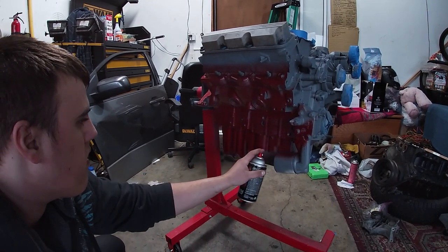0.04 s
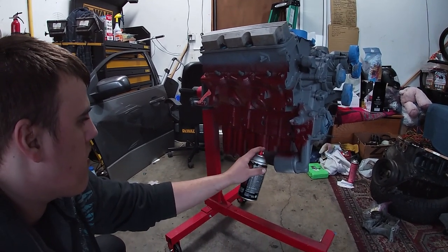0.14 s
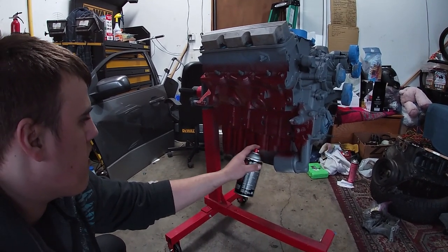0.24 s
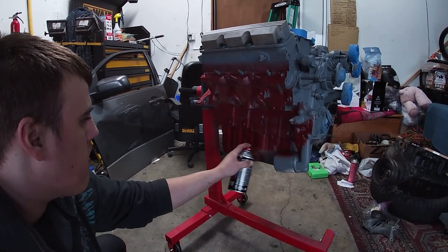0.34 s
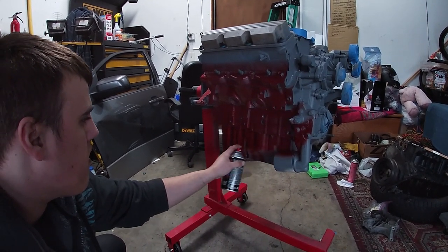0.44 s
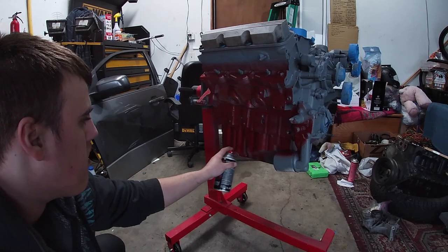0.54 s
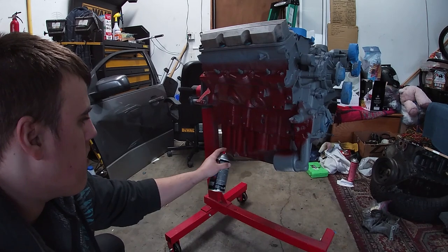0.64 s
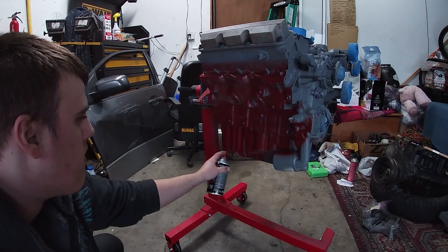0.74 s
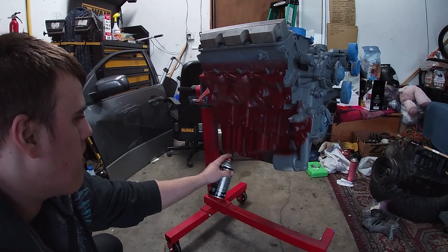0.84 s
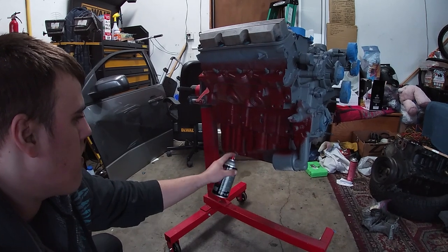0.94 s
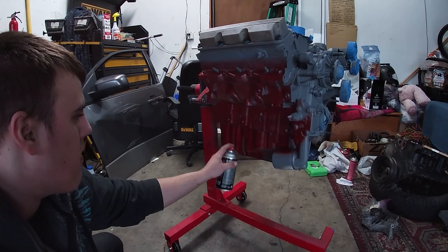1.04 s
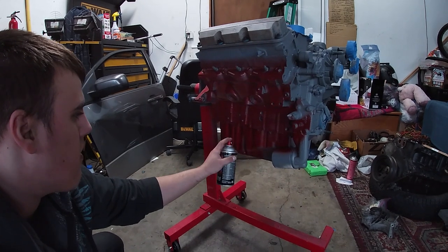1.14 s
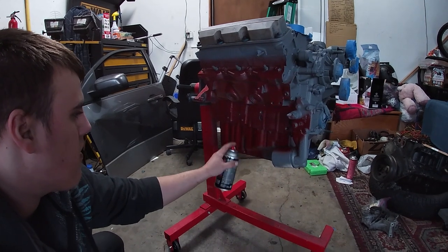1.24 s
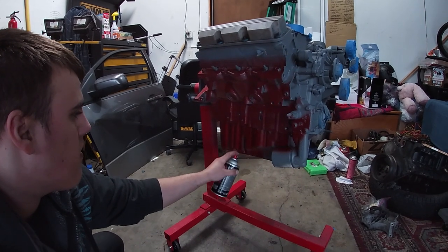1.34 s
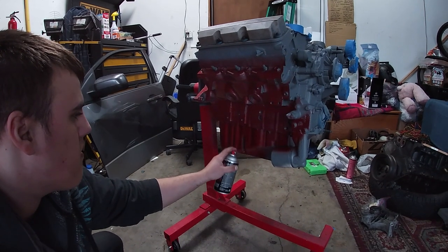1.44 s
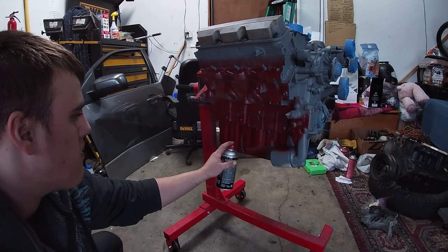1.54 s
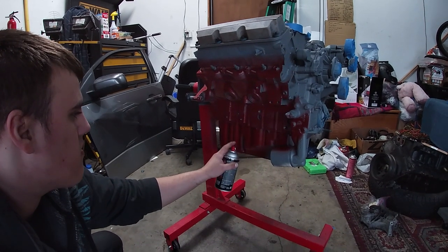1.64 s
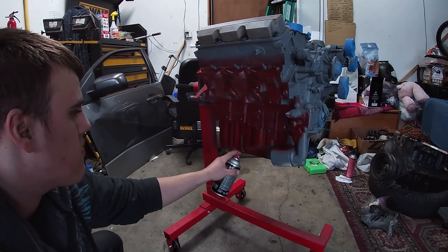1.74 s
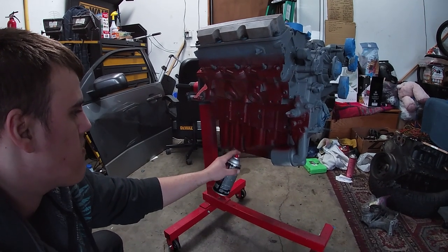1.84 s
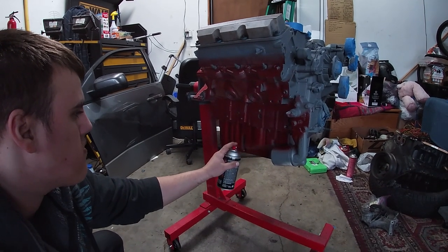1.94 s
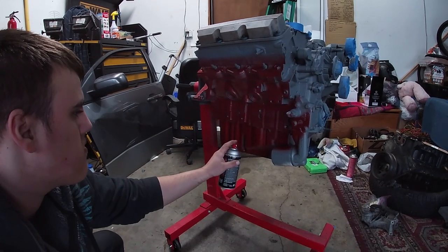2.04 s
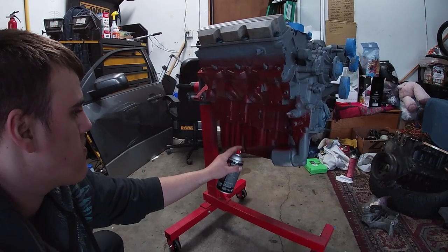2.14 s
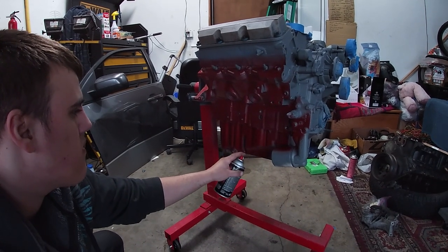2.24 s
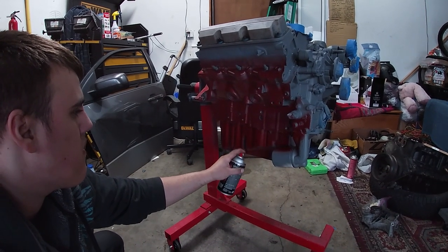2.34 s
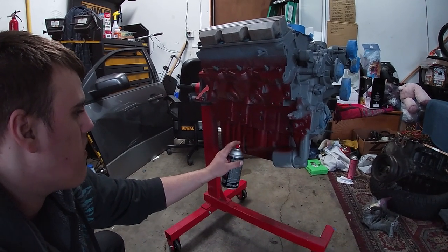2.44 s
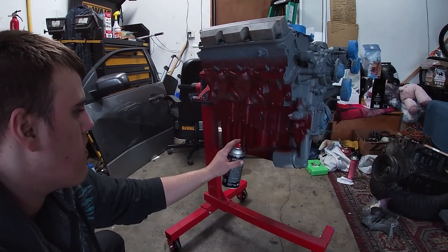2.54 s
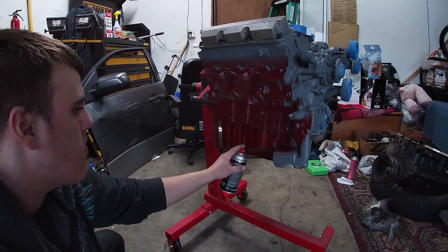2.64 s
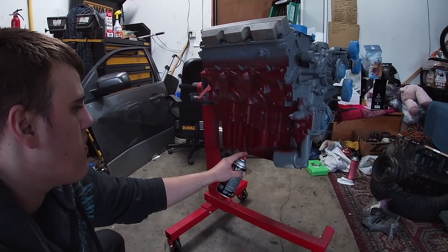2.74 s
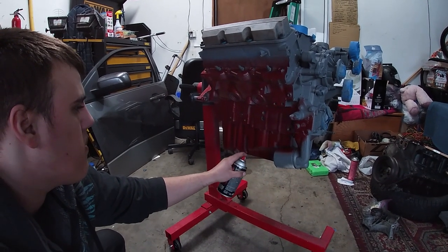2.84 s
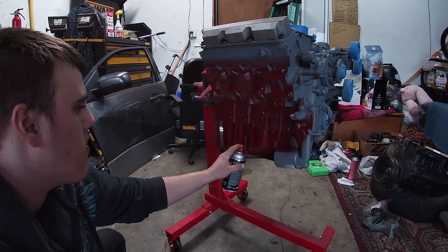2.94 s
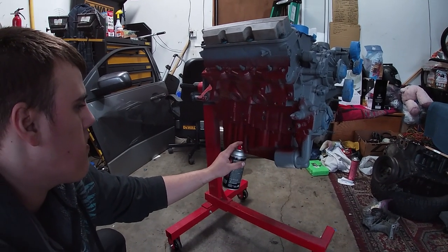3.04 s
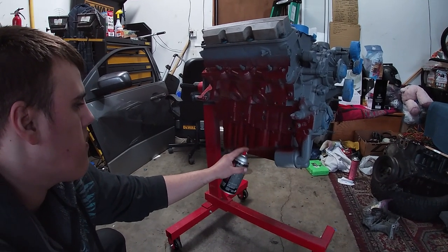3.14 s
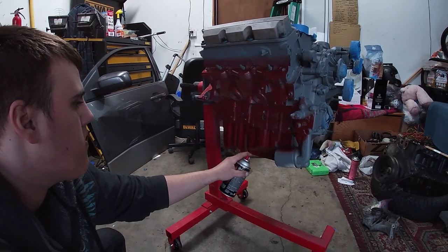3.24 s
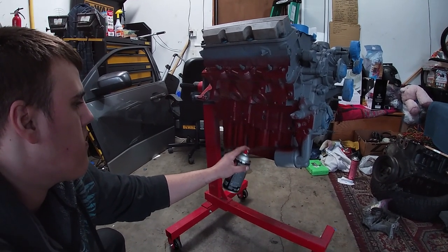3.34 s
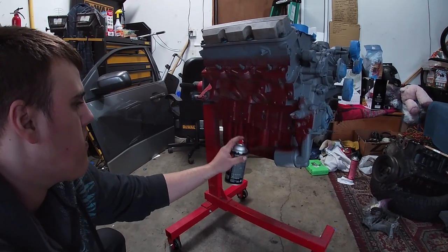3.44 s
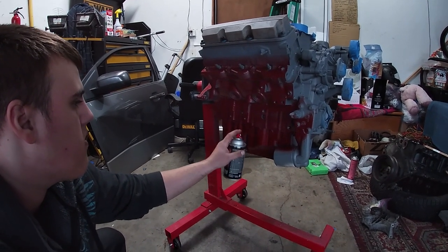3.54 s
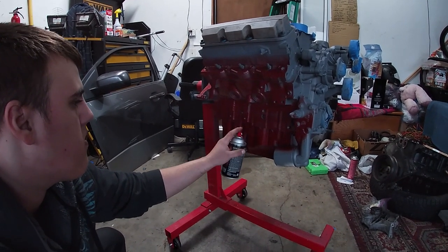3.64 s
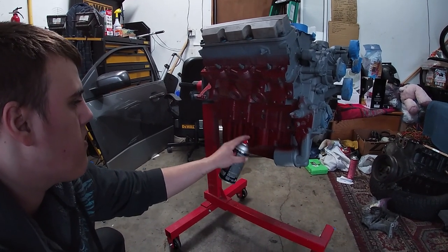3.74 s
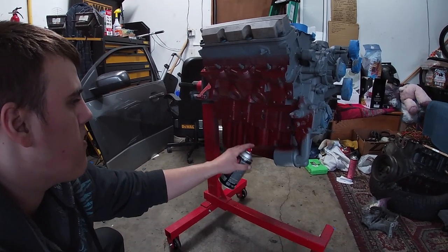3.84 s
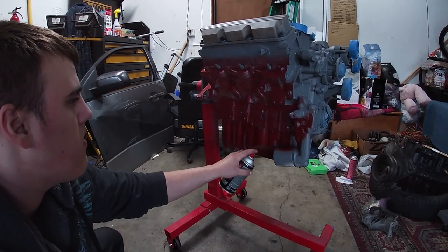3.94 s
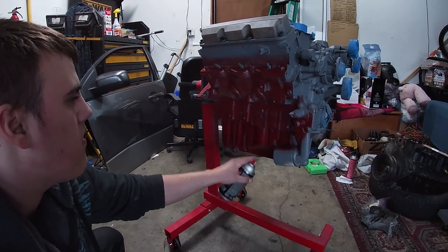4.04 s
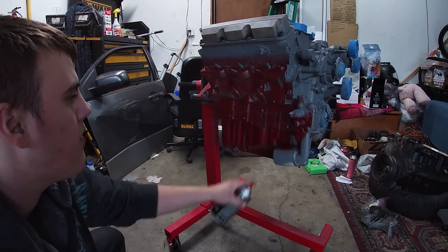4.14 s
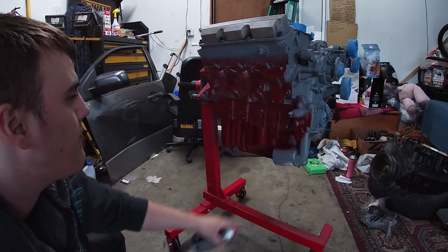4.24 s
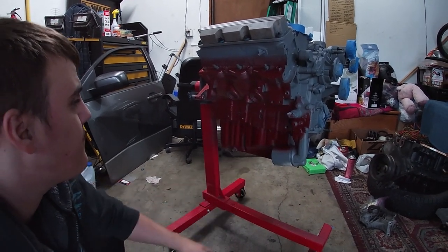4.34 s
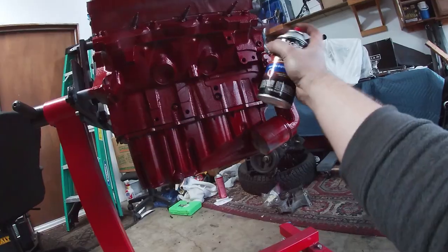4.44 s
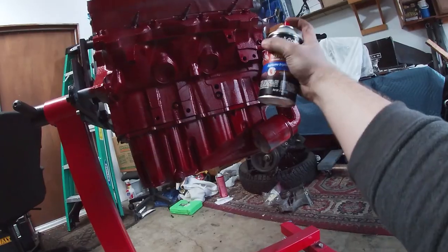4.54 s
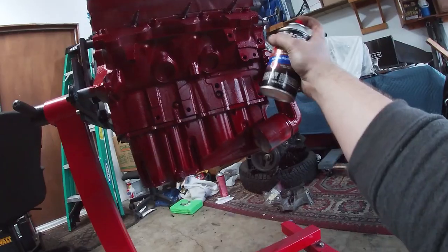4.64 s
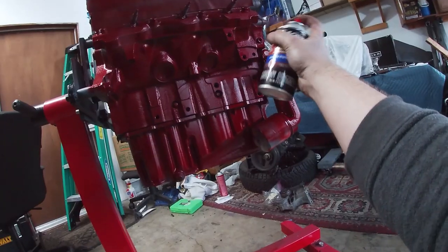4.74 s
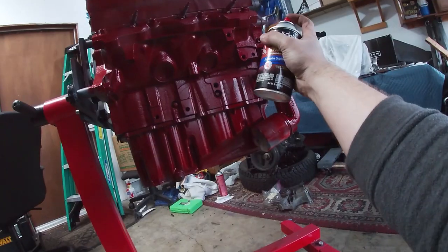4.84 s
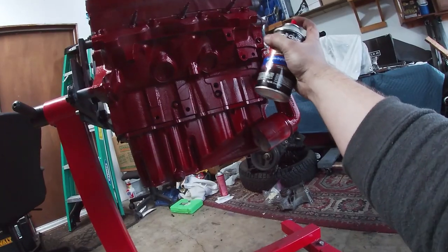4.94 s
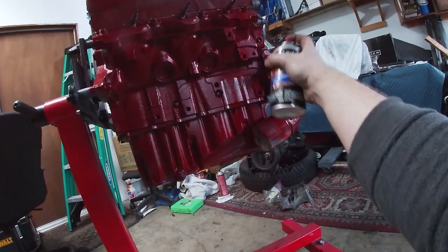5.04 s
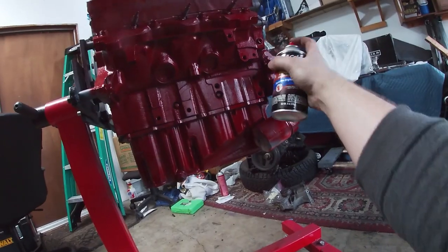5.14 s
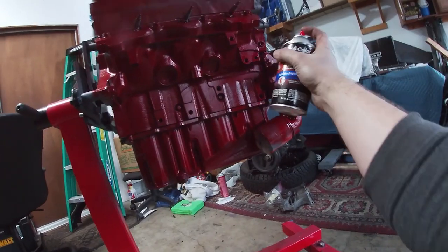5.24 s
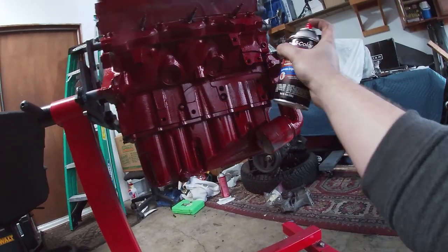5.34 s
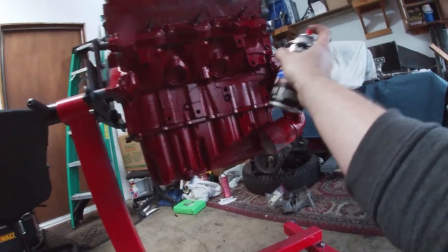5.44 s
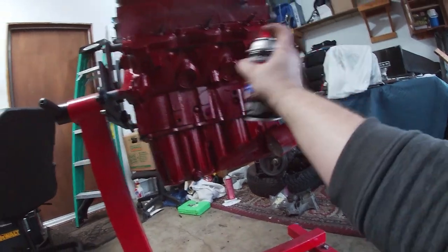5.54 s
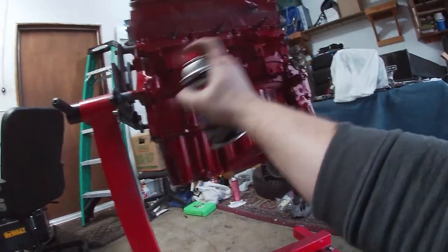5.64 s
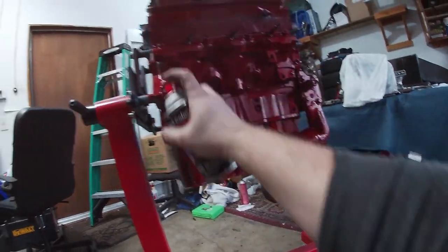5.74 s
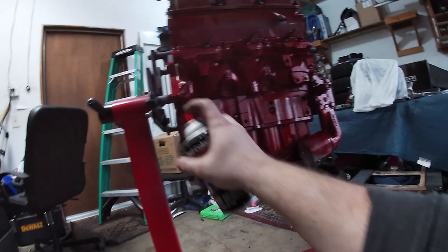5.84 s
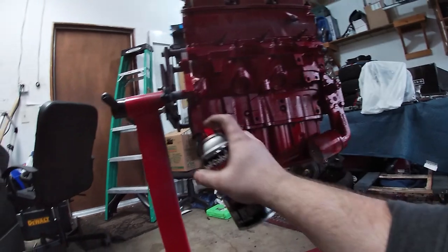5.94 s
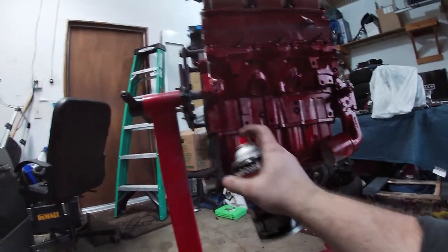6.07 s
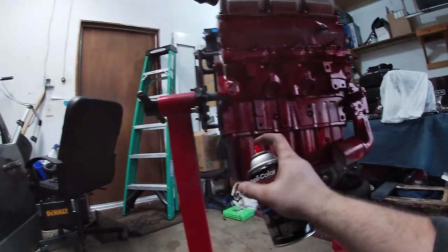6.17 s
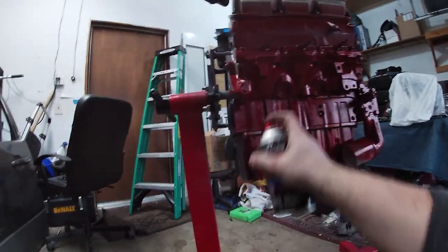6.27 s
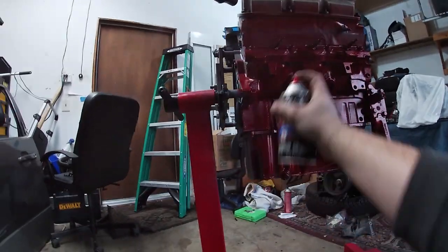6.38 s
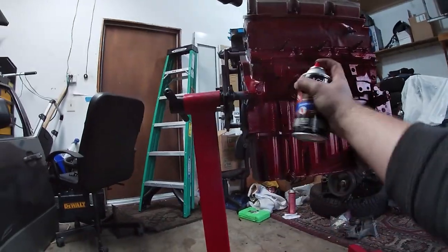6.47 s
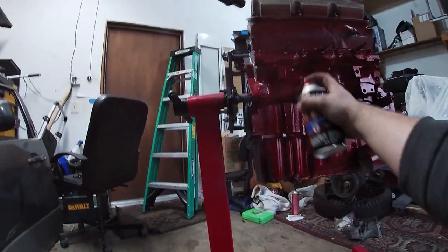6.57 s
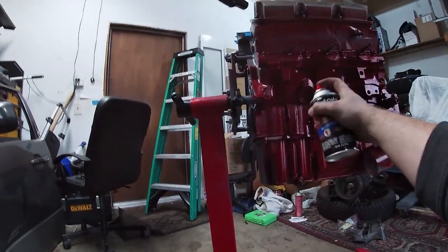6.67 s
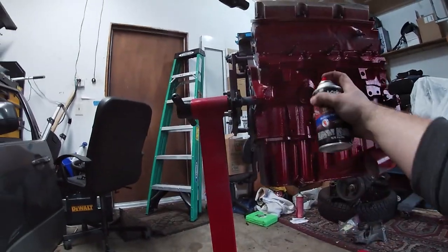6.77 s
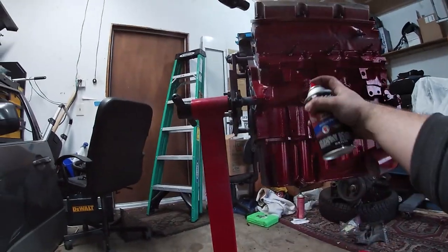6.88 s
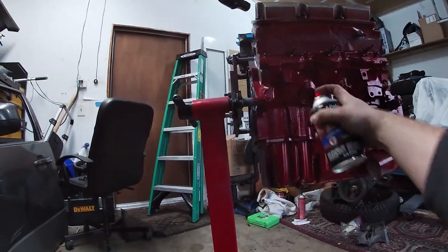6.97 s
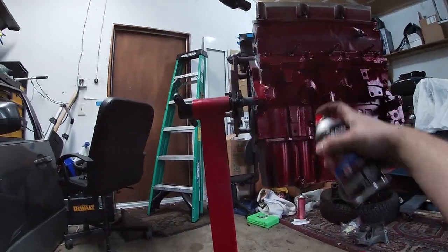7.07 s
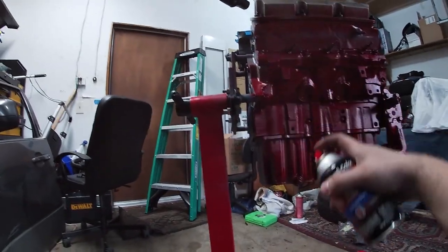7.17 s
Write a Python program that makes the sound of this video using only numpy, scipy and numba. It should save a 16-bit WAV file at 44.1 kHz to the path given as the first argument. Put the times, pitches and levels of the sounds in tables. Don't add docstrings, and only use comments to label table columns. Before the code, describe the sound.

In a small garage, an aerosol can sprays an engine block in brief airy hisses, the second one longest, with the ball rolling and ticking faintly inside between spurts. Low room hum, distant fan and thin whine lie beneath. Halfway, the position jumps nearer; more short spurts follow, then a sudden loud flurry of metallic clacks, and later a smaller rattle between the last bursts. The hand-held microphone bumps softly.

```python
import sys
import numpy as np
from scipy import signal
from scipy.fft import rfft, irfft
from scipy.io import wavfile
from scipy.ndimage import uniform_filter1d
from numba import njit

SR = 44100
rng = np.random.default_rng(int(sys.argv[2]) if len(sys.argv) > 2 else 0)


def boost_factor(decibels):
    exponent = np.asarray(decibels, float) / 20
    return 10 ** exponent


def generate_wav(sig):
    pcm = np.round(np.clip(np.atleast_2d(sig).T, -1, 1) * 32767).astype(np.int16)
    wavfile.write(sys.argv[1], SR, pcm)


N = 317961
CHANGE_S = 4.43

# start_s, length_s, jet_db, change_by_end_db, upper_cavity_answer_db
PRESSES = [(-0.1, 0.23, -41.5, 1.5, 2), (0.301, 0.42, -39.5, -2, 0.5), (1.015, 0.22, -43, 1.5, 1.5),
           (1.407, 0.23, -42, 0, 2.5), (1.864, 0.2, -41, 2, 0), (2.394, 0.18, -40, 0.5, 2),
           (2.905, 0.18, -39.5, 1, 0.5), (3.363, 0.24, -39, -0.5, 1.5), (4.483, 0.18, -40.5, 0.5, -4),
           (4.809, 0.17, -40, -0.5, -7.5), (5.105, 0.15, -41, -0.5, 5.5), (5.56, 0.2, -40.5, 0.5, 0.5),
           (6.535, 0.2, -40.5, -3.5, -4), (6.867, 0.17, -41, 0, -2)]
# low_cavity_hz, middle_cavity_hz, middle_cavity_db, whistling_cavity_db, top_hiss_db
AIMS = [(4000, 5000, -0.5, 1, -0.5), (3600, 5200, -1.5, 0, 1), (2580, 4560, 9, 0, 2.5),
        (3400, 4600, 3.5, -1, 2), (3400, 5100, -4, -2.5, 0.5), (3200, 4740, -2, -1, -1),
        (3550, 4900, -20, -3.5, -1.5), (3400, 4840, 0, -2, -2), (3200, 5000, 0.5, 2, 1),
        (3320, 5300, 1.5, 1, 2), (4000, 4970, 1, -1.5, 2.5), (3400, 4960, -3, -4.5, -2),
        (3900, 5500, 0.5, -0.5, 0.5), (3400, 5420, -1.5, -4.5, 1)]
# pitch_hz, density_db
JET_SPECTRUM = [(410, -65), (700, -12), (1050, -4.5), (2840, -1.5), (3160, -1), (4990, -0.5), (5990, -4.5),
                (6740, -11), (7890, -16), (9860, -18.5), (14200, -22.5), (15900, -9)]
# width_hz, over_plain_jet_db
CAVITIES = [
    (1060, -17),
    (1400, -10),
    (900, -8),
    (1230, -9),
]
ANSWER_SHARES = [0.19, 0.15, 0.7]
# opening_hz, closing_hz, opening_db, open_db, closing_db
ARM_SWEEP_FAR = [(3530, 3500, 0, 0, 0), (4400, 5500, -5, 1, -7), (7030, 7080, 1, 1.5, 1.5),
                 (9510, 9460, -10.5, -3.5, -3.5)]
ARM_SWEEP_NEAR = [(3800, 3830, 0, 0, 0), (4230, 3700, 11, 7.5, 8.5), (6720, 6440, 7.5, 4.5, 5.5),
                  (8600, 9240, 3, 1.5, 1)]
# middle_s, length_s, entering_hz, leaving_hz, lift_db
POCKETS = [(.05, 0.13, 5100, 4940, 4.5), (.09, .12, 4000, 3800, 3), (.38, 0.1, 4330, 4600, 3.5),
           (.37, 0.11, 5300, 5200, 3.5), (.44, .08, 5000, 5000, 1), (.54, 0.12, 2500, 3100, 4.5),
           (.64, .14, 4560, 5000, 5.5), (0.664, 0.21, 2200, 2190, 3.5), (.66, 0.27, 3550, 3600, 1),
           (1.172, 0.15, 3700, 3600, 5), (1.17, .16, 2500, 2580, 4), (1.5, .14, 4300, 4100, 3.5),
           (1.61, .1, 3600, 3450, 4), (1.61, 0.065, 5450, 5400, 3), (1.916, .12, 4200, 4100, 3.5),
           (2.02, .14, 3450, 3300, 3), (2.03, .14, 5350, 5350, 3), (2.442, .1, 4100, 4200, 4.5),
           (2.487, 0.082, 4900, 4800, 4), (2.51, .18, 3400, 3250, 3), (2.98, 0.092, 4200, 4150, 3),
           (2.99, 0.17, 3430, 3400, 3.5), (3.002, 0.11, 5350, 5350, 3.5), (3.07, .1, 4850, 4800, 0.5),
           (3.08, 0.077, 2300, 2300, 3), (3.42, 0.084, 4100, 4050, 3.5),
           (3.487, 0.091, 4750, 4550, 4.5), (3.572, .14, 3200, 3200, 3), (3.52, .12, 2300, 2230, 2),
           (4.58, 0.24, 3200, 3000, 4.3), (4.58, 0.3, 4170, 4200, 5.7), (4.62, .14, 5250, 5300, 3),
                (4.89, 0.23, 3150, 3150, 6.1), (4.95, 0.079, 5000, 5200, 2.3), (5.18, .1, 4200, 4400, 4.8),
                (5.2, .14, 5300, 5050, 3.2), (5.23, 0.087, 3600, 3600, 5), (5.66, 0.23, 3800, 3100, 6.7),
                (5.71, 0.11, 5100, 4660, 4), (6.6, 0.29, 3900, 3900, 6.8), (6.94, 0.23, 3200, 3130, 5),
                (7.01, 0.13, 4400, 4400, 5.5), (6.96, .2, 5500, 5440, 3)]

# start_s, base_db, wall_db, sharpness_db
CLACKS = [(2.765, -56, -54, 0), (5.085, -45, -55, 2), (5.1101, -34, -37.5, -2), (5.125, -23, -40, 3),
          (5.818, -35.5, -60, 7.5), (5.852, -46, -55, 12), (5.888, -40, -11.5, -0.5), (5.8913, -9, -14, -1),
          (5.913, -40, -33, -3), (5.964, -24.5, -23, 0), (5.98, -7.5, -27, -1), (5.988, -46, -18.5, -5),
          (6.0157, -14, -27, -0.5), (6.0441, -40, -21, -2), (6.049, -13, -30, 1), (6.055, -35, -26, -2),
          (6.0764, -17, -32, -8), (6.084, -48, -18, -3), (6.0914, -18.5, -26, -3), (6.1071, -42, -27.5, 1),
          (6.1129, -20, -27.5, -1), (6.131, -18.5, -31, -9), (6.138, -48, -32, -12),
          (6.1428, -21.5, -36, -3), (6.1547, -22.5, -31, -5), (6.167, -29, -33.5, -6),
          (6.181, -35, -52, -9), (6.6354, -36, -37, 8), (6.6665, -15, -26.5, 6.5), (6.6899, -14, -52, -1.5),
          (6.712, -12, -31.5, 0), (6.7394, -17.5, -36, 2), (6.769, -30, -40, -2), (6.786, -42, -41, -4),
          (6.794, -48, -43, -2), (6.801, -44, -51, -6), (6.83, -40, -55, -6), (7.096, -48, -49, 1),
          (7.116, -43, -47, 3), (7.1235, -49, -50, -5), (7.1291, -32, -41, 7), (7.137, -40, -48, 11),
          (7.187, -44.5, -49, 4.5), (7.195, -51, -47, 3)]
# start_s, base_db
TICKS = [(0.157, -34), (0.175, -38), (0.197, -34), (0.205, -28.5), (0.2155, -34), (0.22, -26.5),
         (0.2386, -32), (0.256, -43), (0.267, -32), (0.761, -37), (0.81, -35), (1.066, -29), (1.096, -34),
         (1.11, -33), (1.122, -31), (1.1315, -24.5), (1.144, -25), (1.1515, -25.5), (1.162, -28),
         (1.175, -31), (1.284, -40), (1.537, -30), (1.5805, -34), (1.5857, -30), (1.591, -30),
         (1.6274, -26), (1.6408, -31), (1.652, -32), (1.658, -29.5), (1.6875, -32), (1.694, -36),
         (1.7253, -42), (2.223, -42), (2.846, -45), (2.878, -49), (3.976, -47), (4.0172, -49),
         (4.3036, -51), (5.4053, -50), (5.419, -46), (5.44, -53), (5.459, -47)]
# late_s, share
REBOUNDS = [
    (0, -1.12),
    (.0009, 0.32),
    (.0021, -0.55),
    (.0036, 0.25),
]
# start_s, level_db
SHOULDER_BLOWS = [(2.7645, -45), (2.777, -45), (5.888, -10.5), (5.89, -17.5), (5.9624, -21), (5.979, -40),
                  (6.0452, -38), (6.053, -40)]
# start_s, fastest_s, stop_s, base_db, wall_db
ROLLS = [(0.095, 0.212, 0.31, -40.5, -61), (0.515, 0.636, 0.74, -43.5, -49), (0.743, 0.764, 0.83, -41, -46),
         (0.972, 1.043, 1.19, -44.5, -47.5), (1.063, 1.154, 1.17, -45, -51),
         (1.203, 1.32, 1.355, -51, -56.5), (1.46, 1.55, 1.64, -43.5, -45.5),
         (1.576, 1.64, 1.69, -43.5, -59), (2.07, 2.142, 2.24, -48.5, -58), (2.77, 2.79, 2.93, -63, -60),
         (3.93, 3.98, 3.85, -60, -68), (4.447, 4.468, 4.5, -50.5, -45), (4.484, 4.64, 4.7, -48, -47),
         (4.647, 4.7, 4.805, -53, -41.5), (5.112, 5.128, 5.16, -40, -34.5), (5.128, 5.148, 5.4, -43.5, -54),
         (5.396, 5.459, 5.55, -70, -52), (5.495, 5.53, 5.6, -53, -48), (5.761, 5.786, 5.9, -58, -49),
         (6.15, 6.172, 6.1, -52, -43), (6.19, 6.353, 6.55, -71, -49.5), (6.745, 6.783, 6.8, -53, -58),
         (7.033, 7.066, 8.7, -56, -44.5), (7.14, 7.146, 7, -55, -49)]
# pitch_hz, level_db, t60_s
BASE_MODES_FAR = [(3600, -16, 0.019), (4000, -13, 0.015), (4230, -16, 0.013), (4360, -12, 0.023),
                  (4547, -4.5, 0.032), (4700, -21, 0.0098), (5300, -18, .008)]
BASE_MODES_NEAR = [(3200, -9.5, 0.013), (3600, -7, 0.01), (3990, -10, 0.016), (4280, -25, 0.0074),
                   (4880, -30, 0.005)]
WALL_MODES_FAR = [(1760, -7.5, 0.025), (2000, -2.5, 0.042), (2300, 2.5, 0.016), (2560, -1.5, 0.034)]
WALL_MODES_NEAR = [(1400, -20.5, 0.015), (1677, -11, 0.02), (1830, -12, 0.016), (2130, -7.5, 0.011),
                   (2500, -9, 0.0088)]
SHOULDER_MODES = [(1184, -7, .016), (1303, -4, 0.026), (1560, -10, 0.017)]
# pitch_hz, level_db, t60_s
RIM_MODES = [(2650, -16, 0.0041), (3040, -4.5, 0.019), (3330, -1.5, 0.01), (3550, -1, 0.013),
             (4330, -8.5, 0.0073), (4620, -2.5, 0.011), (5060, -1.5, 0.0065), (5850, -12, 0.004),
             (6930, -8.5, 0.006)]
# start_s, base_hz, wall_hz
SLOSH = [(0.15, 3870, 2180), (0.75, 3510, 2000), (1.12, 3960, 2200), (1.27, 3400, 2170), (2.2, 3400, 2270),
         (2.76, 3400, 1760), (4.7, 3200, 1835), (5.12, 3650, 1720), (5.17, 3350, 1735), (5.45, 3460, 1910),
         (5.89, 3576, 1933), (6.055, 3620, 1820), (6.075, 4000, 1820), (6.18, 3800, 1780),
         (6.5, 3900, 1630), (6.666, 3990, 1910), (6.69, 3660, 1710), (6.83, 3870, 1640), (7.08, 3400, 2000),
         (7.2, 3550, 1950)]

# start_s, length_s, pitch_hz, width_hz, level_db
CREAKS = [(0.964, 0.061, 70, 58, -61.5), (1.265, 0.039, 128.5, 150, -65), (2.05, 0.06, 812, 407, -56.5),
          (2.522, 0.04, 504, 203, -61.5), (2.661, 0.055, 900, 500, -55), (2.761, 0.052, 1400, 614, -55),
          (2.758, 0.05, 2620, 700, -54.5), (2.762, 0.048, 4400, 1500, -57), (3.757, 0.042, 900, 600, -61),
          (4.106, 0.047, 3000, 1000, -57.5), (4.108, .03, 1050, 300, -62), (4.301, 0.014, 3870, 2500, -59),
          (4.359, 0.12, 2770, 2000, -62.5), (4.204, 0.067, 2230, 140, -57.5),
          (4.302, 0.019, 2350, 300, -52.5), (5.594, 0.032, 745.2, 302, -54.5),
          (5.705, 0.026, 350, 162.7, -45), (5.729, 0.096, 330, 200, -57), (6.35, 0.06, 546, 303, -60.5)]
# start_s, length_s, rumble_db, rub_db
BUMPS = [(0.004, 0.093, -63, -81), (0.485, 0.24, -81, -75), (0.957, 0.16, -63, -71),
         (1.117, 0.12, -65, -91), (1.276, 0.038, -55, -70), (2.357, 0.96, -94, -73), (2.89, 0.17, -75, -89),
         (3.25, 0.2, -79, -110), (4.256, 0.064, -58, -89), (4.49, 0.26, -66, -107), (4.79, 0.21, -68, -70),
         (5.725, 0.075, -66, -46), (5.755, 0.08, -64, -66), (5.81, 0.27, -62, -72),
         (6.67, 0.14, -58.5, -69), (6.748, 0.076, -55, -55.5), (6.985, 0.07, -74, -56.5),
         (7.018, 0.13, -65, -55), (7.18, 0.092, -74, -88)]
# pitch_hz, density_db
HUM_FAR = [(12, -33), (20, -1), (44, -3), (106, -13), (211, -7), (356, -8), (1060, 2.5), (1890, 1),
           (2290, -1.5), (3560, -5), (4190, -6), (6320, -12), (6860, -7), (7870, -15), (14000, -43)]
HUM_NEAR = [(12, -29), (20, 1), (170, -12), (319, -7), (615, -7), (1160, -5), (1290, -4), (1890, 0),
            (2170, -9), (3760, -8), (5200, -16.5), (7500, -15.5), (8300, -25), (11300, -35), (12300, -56)]


def spray():
    tables = presses()
    jet_db, top_db, *cavity_hz, second_db, third_db, fourth_db = in_time(np.vstack(tables))
    plain, white = coloured(JET_SPECTRUM), rng.standard_normal(N)
    upper = highpass(plain, 1530, order=8)
    shade_db = np.where(np.arange(N) > CHANGE_S * SR, -3, -16)
    jet = upper + boost_factor(shade_db) * (plain - upper)

    swells_db = [0, second_db, third_db, fourth_db]
    for hz, swell_db, (width_hz, lift_db) in zip(cavity_hz, swells_db, CAVITIES):
        cavity = rms_one(resonance(white, hz, width_hz))
        jet += boost_factor(lift_db + swell_db + 0.71 * drift(14)) * cavity

    jet += (boost_factor(top_db) - 1) * highpass(jet, 11500, order=3)
    notch_hz, notch_width_hz = 6000, 300
    jet -= 0.4 * signal.filtfilt(*signal.iirpeak(notch_hz, notch_hz / notch_width_hz, SR), jet)
    flutter = boost_factor(0.21 * drift(35) + 0.37 * drift(550))
    valve = gate(tables, rise_s=0.003, fall_s=0.025)
    return boost_factor(jet_db) * valve * flutter * rms_one(mottled(jet, spread_db=1.8))


def presses():
    valve_lag_s, open_s, crack_open_db = 0.0015, 0.032, -3
    tables = []
    for press, aim in zip(PRESSES, AIMS):
        s, length, jet_db, end_db, answer_db = press
        low_hz, middle_hz, middle_db, whistle_db, top_db = aim
        arm_sweep = ARM_SWEEP_NEAR if s > CHANGE_S else ARM_SWEEP_FAR
        first_hz, last_hz, *lifts_db = np.transpose(arm_sweep)

        shift_hz = np.array([low_hz, middle_hz, 0, 0]) - (first_hz + last_hz) / 2 * [1, 1, 0, 0]
        extra_db = answer_db * np.array(ANSWER_SHARES) + [middle_db, whistle_db, 0]
        times = [s, s + open_s, s + length]
        moments = zip(times, [crack_open_db, 0, end_db], [first_hz, first_hz, last_hz], lifts_db)
        rows = []
        for at, db, hz, lift_db in moments:
            rows.append((at + valve_lag_s, jet_db + db, top_db, *(hz + shift_hz), *(lift_db[1:] + extra_db)))
        tables.append(rows)
    return tables


def gate(tables, rise_s, fall_s):
    t, out = np.arange(N) / SR, np.zeros(N)
    for rows in tables:
        start, stop = rows[0][0], rows[-1][0]
        head_start = 1.0 if start < 0.01 else 0.0
        opened = 1 - np.exp(-np.maximum(t - start + head_start, 0) / rise_s)
        closing = np.exp(-(np.maximum(t - stop, 0) / fall_s) ** 1.5)
        out = np.maximum(out, opened * closing)
    return out


def mottled(x, spread_db):
    hz, t, spectrum = signal.stft(x, SR, nperseg=320)
    field = rng.standard_normal(spectrum.shape)
    for _ in range(2):
        field = uniform_filter1d(field, size=22, axis=1)
    scatter = np.where(hz > 6200, 1.8, 1)[:, None]
    lift_db = spread_db * scatter * rms_one(field)

    pocket_width_hz, pocket_depth = 174, 1.7
    for s, length, first_hz, last_hz, pocket_db in POCKETS:
        along = (t - s) / length
        centre_hz = (first_hz + last_hz) / 2 + (last_hz - first_hz) * along
        off_centre = (hz[:, None] - centre_hz) / pocket_width_hz
        lift_db += pocket_depth * pocket_db * np.exp(-(2 * along) ** 4 - off_centre ** 2)
    return signal.istft(spectrum * boost_factor(lift_db), nperseg=320)[1][:N]


def knocks():
    s, *strengths_db = blow_strengths()
    at, clicks = np.round((s + 0.00045) * SR).astype(int), np.zeros((3, N))
    uneven = rng.uniform(0.73, 1.2, (len(at), 4))
    for k, (late_s, share) in enumerate(REBOUNDS):
        late = (late_s * uneven[:, k] * SR).astype(int)
        clicks[:, at + late] = share * boost_factor(strengths_db)
    base, wall, crack = clicks

    touch = np.zeros(N)
    touch[at] = -boost_factor(strengths_db[2] + 20.5)
    snap = band(touch, 1860, 7200)
    rim = boost_factor(1.5) * band(ring(crack, RIM_MODES, 1.0), 1190, 9500)
    thud, burst = crack_noise(crack)
    edge = snap + rim + boost_factor(4) * burst
    body = can(boost_factor(-5.5) * base, boost_factor(0.5) * wall, spread_db=2.5)
    return body + shoulder() + thud + edge, edge - 0.42 * rim


def blow_strengths():
    growth, pivot_db = 1.2, -25.5
    blows = [(s, base_db, base_db - 30, base_db - 29) for s, base_db in TICKS]
    for s, base_db, wall_db, sharp_db in CLACKS:
        power = boost_factor(base_db - 14) ** 2 + boost_factor(wall_db - 12.5) ** 2
        crack_db = pivot_db * (1 - growth) + growth * 10 * np.log10(power) + sharp_db
        blows.append((s, base_db, wall_db, crack_db))
    return np.transpose(blows)


def crack_noise(crack):
    decay_s = 0.00094
    envelope = signal.lfilter([1], [1, -np.exp(-1 / (decay_s * SR))], np.abs(crack))
    puff = envelope * rng.standard_normal(N)
    burst = band(puff, 5260, 6650, order=4)
    burst += boost_factor(-5.0) * band(puff, 9020, 10500, order=3)
    burst += boost_factor(-15) * band(puff, 14500, 17000)
    return boost_factor(-10.0) * band(puff, 240, 500), burst


def shoulder():
    clicks = np.zeros(N)
    for s, level_db in SHOULDER_BLOWS:
        clicks[round(s * SR)] = boost_factor(level_db)
    return band(ring(clicks, SHOULDER_MODES, 0.74), 1215, 1420)


def rolling():
    edge_s = 0.015
    start, fastest, stop, *levels_db = np.transpose(ROLLS)
    times = np.transpose([start - edge_s / 2, start, fastest, stop, stop + edge_s])
    base, wall = swells(times, [-60, -8, 0, -10.5, -60], np.transpose(levels_db))

    sizes = boost_factor(2.04 * np.minimum(rng.exponential(1, N), 3)) * rng.choice([-1, 1], N)
    touching = rng.random(N) < 5000 / SR
    contacts = sizes * touching * boost_factor(-12 + 2.0 * drift(45))
    fizz = boost_factor(-8) * band(contacts * base, 7600, 14500)
    return fizz + can(contacts * base, contacts * wall * boost_factor(-7), spread_db=3.0)


def can(base_clicks, wall_clicks, spread_db):
    near = np.arange(N) > CHANGE_S * SR
    base = ring(base_clicks * ~near, BASE_MODES_FAR, spread_db)
    base += ring(base_clicks * near, BASE_MODES_NEAR, spread_db)
    wall = ring(wall_clicks * ~near, WALL_MODES_FAR, spread_db)
    wall += ring(wall_clicks * near, WALL_MODES_NEAR, spread_db)

    base_hz, wall_hz = in_time(SLOSH)
    base += retuned(base_clicks, base_hz, np.where(near, 0.5, -5), t60_s=0.016)
    wall += retuned(wall_clicks, wall_hz, np.where(near, -3, -6), t60_s=0.025)
    both = band(base, 2800, 5600, order=3) + band(wall, 1200, 2800, order=3)
    return signal.sosfilt(signal.butter(2, 1000, "high", fs=SR, output="sos"), both)


def creaks():
    out = np.zeros(N)
    for s, length, hz, width_hz, level_db in CREAKS:
        at, size = round(s * SR), round(length * SR)
        rub = resonance(rng.standard_normal(round(0.1 * SR)), hz, width_hz)[:size]
        fade = np.sqrt(np.hanning(len(rub))) * np.linspace(1.8, 0.2, len(rub))
        out[at:at + len(rub)] += boost_factor(level_db) * rms_one(rub) * fade
    return out


def garage(x):
    t = np.arange(round(0.6 * SR)) / SR
    dull, bright = rng.standard_normal((2, len(t)))
    t60_s = 0.27
    tail = band(dull, 250, 9400.0) * boost_factor(-60 * t / t60_s)
    tail += band(bright, 5300, 16000) * boost_factor(-85 * t / t60_s)
    tail *= t > 0.006
    return signal.fftconvolve(x, tail / np.sqrt(np.sum(tail ** 2)))[:N]


def handling():
    s, length, *levels_db = np.transpose(BUMPS)
    times = np.transpose([s - length, s, s + length])
    bumps = swells(times, [-40, 0, -40], np.transpose(levels_db))
    rumble_gain, rub_gain = bumps + boost_factor([[-86.5], [-78]])
    rumble, rub = rng.standard_normal((2, N))
    thumps = rumble_gain * rms_one(band(rumble, 18.4, 71.6))
    thumps += rub_gain * rms_one(band(rub, 127.6, 252.5, order=4))
    return boost_factor(2.0 * drift(23.0)) * thumps


def hum():
    t = np.arange(N) / SR
    near = np.clip((t - CHANGE_S) / 0.027, 0, 1)
    out = (1 - near) * boost_factor(-58) * coloured(HUM_FAR) + near * boost_factor(-60) * coloured(HUM_NEAR)
    out += boost_factor(-78.5) * rms_one(resonance(rng.standard_normal(N), 156.5, 40))
    lull_db = -4 * np.exp(-((t - 0.915) / 0.027) ** 2)
    return out * boost_factor(1.6 * drift(8.1) + lull_db)


def whine():
    t = np.arange(N) / SR
    return boost_factor(-65.5) * np.sin(2 * np.pi * 6701 * t) * (t < 4.19)


def in_time(rows):
    s, *columns = np.transpose(rows)
    return [np.interp(np.arange(N) / SR, s, c) for c in columns]


def swells(times, shape_db, levels_db):
    t, out = np.arange(N) / SR, 0
    for at, level_db in zip(times, levels_db):
        out = out + boost_factor(level_db)[:, None] * boost_factor(np.interp(t, at, shape_db))
    return out


def drift(rate_hz):
    r = np.exp(-40 * np.pi * rate_hz / SR)
    slow = signal.lfilter([1], [1, -2 * r, r * r], rng.standard_normal(N // 20 + 4002))[4000:]
    return np.interp(np.arange(N) / 20, np.arange(len(slow)), rms_one(slow))


def coloured(spectrum):
    hz, level_db = np.transpose(spectrum)
    grid = np.maximum(np.fft.rfftfreq(N, 1 / SR), 1)
    shape_db = np.interp(np.log(grid), np.log(hz), level_db, left=-120, right=-120)
    return rms_one(irfft(rfft(rng.standard_normal(N)) * boost_factor(shape_db), N))


def rms_one(x):
    return x / np.sqrt(np.mean(x ** 2) + 1e-20)


def band(x, low_hz, high_hz, order=2):
    return signal.sosfilt(signal.butter(order, [low_hz, high_hz], "band", fs=SR, output="sos"), x)


def highpass(x, hz, order):
    return signal.sosfiltfilt(signal.butter(order, hz, "high", fs=SR, output="sos"), x)


def ring(clicks, modes, spread_db):
    out = np.zeros(N)
    for hz, level_db, t60_s in modes:
        r, w = boost_factor(-60 / (t60_s * SR)), 2 * np.pi * hz / SR
        struck = clicks * boost_factor(level_db + spread_db * rng.standard_normal(N))
        out += signal.lfilter([0, np.sin(w)], [1, -2 * r * np.cos(w), r * r], struck + 1e-18)
    return out


@njit
def glide(x, cosine, r):
    out = np.zeros(len(x))
    for i in range(2, len(x)):
        out[i] = x[i] - x[i - 2] + 2 * r * cosine[i] * out[i - 1] - r * r * out[i - 2]
    return out * (1 - r * r) / 2


def resonance(x, hz, width_hz):
    cosine = np.cos(2 * np.pi * hz / SR) * np.ones(len(x))
    r = np.exp(-np.pi * width_hz / SR)
    return glide(glide(x, cosine, r), cosine, r)


def retuned(clicks, hz, level_db, t60_s):
    r = boost_factor(-60 / (t60_s * SR))
    return boost_factor(level_db) * glide(clicks + 1e-18, np.cos(2 * np.pi * hz / SR), r) / (1 - r * r)


def scene():
    jet = spray()
    ball = rolling() + creaks()
    blows, edge = knocks()
    sent = boost_factor(-11.0) * jet + boost_factor(-11.0) * ball + boost_factor(-17.5) * blows + boost_factor(-10.5) * edge
    background = hum() + whine() + handling()
    return np.tile(jet + ball + blows + garage(sent) + background, (2, 1))


def roll_off(x):
    return signal.sosfilt(signal.butter(12, 16510, fs=SR, output="sos"), x)


def record(dry):
    rounded = 0.6 * np.tanh(dry[0] / 0.6)
    hz, _, spectrum = signal.stft(rounded, SR, nperseg=256)
    top = (hz[:, None] > 11800) * spectrum
    power = uniform_filter1d(np.abs(top) ** 2, size=4, axis=0)
    level = np.sqrt(uniform_filter1d(power, size=6, axis=1) + 1e-24)
    opened = np.clip(level / boost_factor(-110) - 1, 0, 1)
    kept = top * opened * np.clip((15750 - hz[:, None]) / 2000, 0, 1)
    turned = boost_factor(6) * kept * np.exp(2j * np.pi * rng.random(top.shape))
    both = signal.istft(spectrum - top + np.array([kept, turned]), nperseg=256)[1][:, :N]
    return roll_off(both)


dry = scene()
out = record(dry)
generate_wav(out)
```